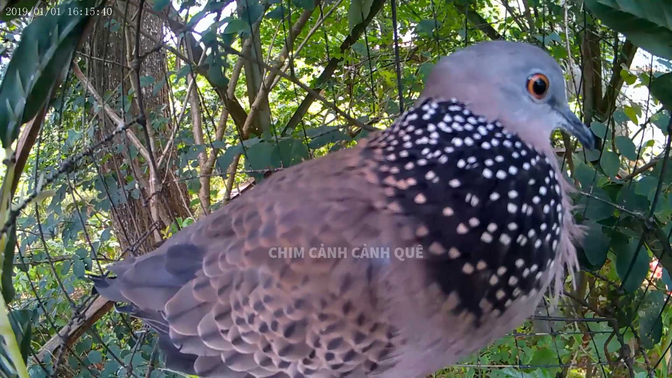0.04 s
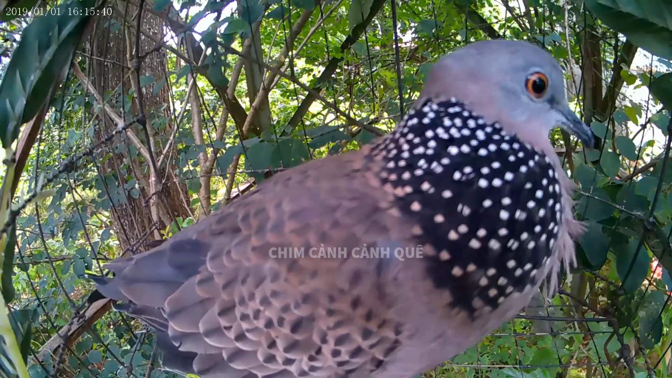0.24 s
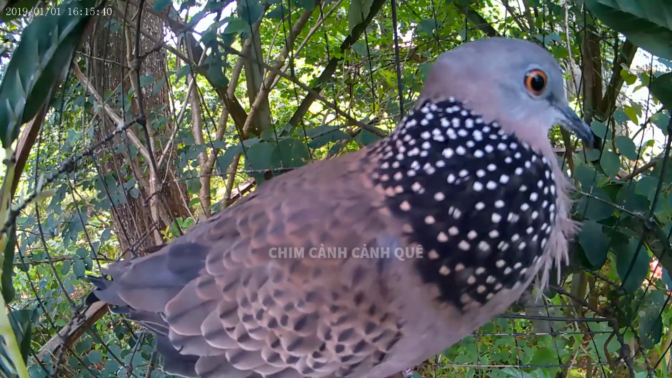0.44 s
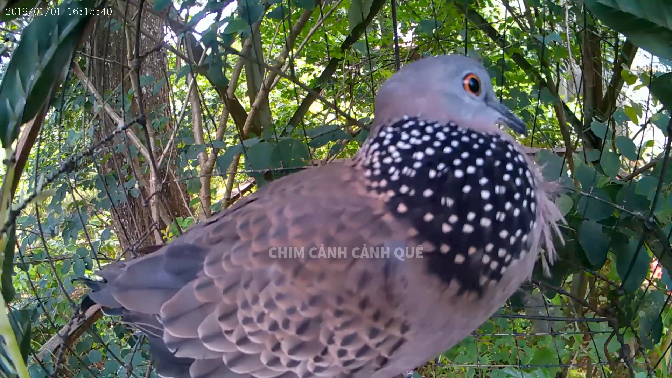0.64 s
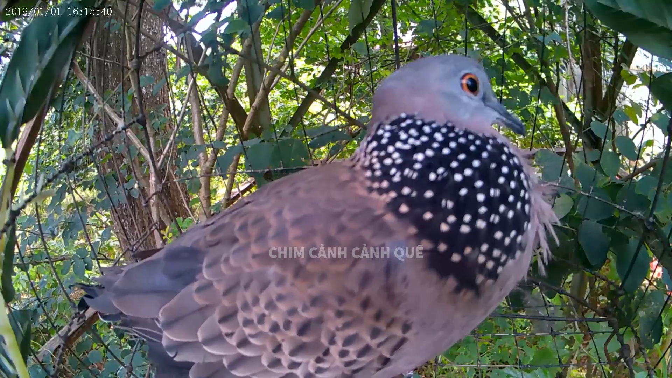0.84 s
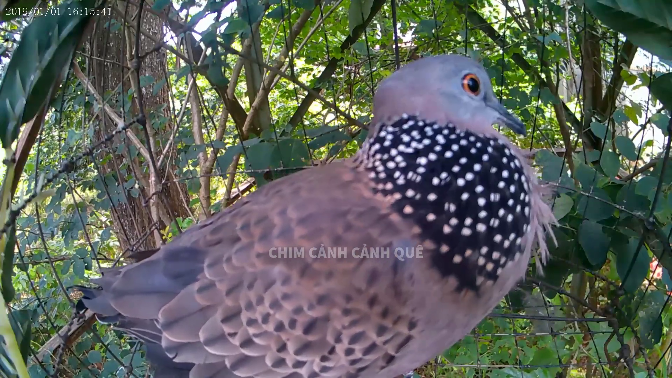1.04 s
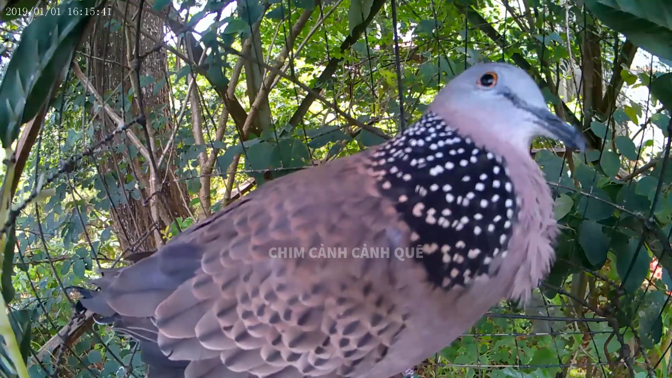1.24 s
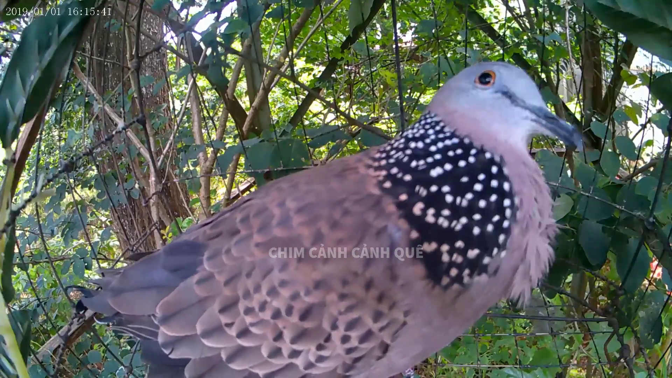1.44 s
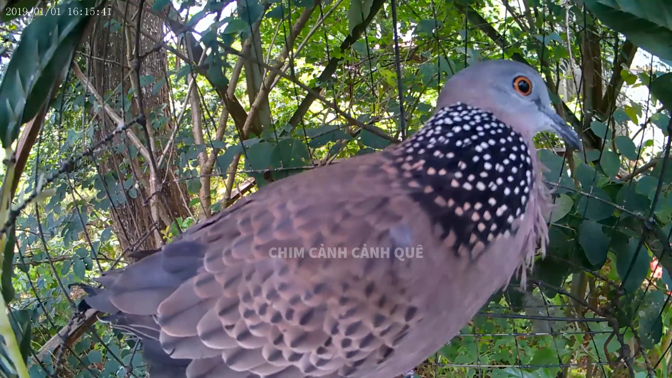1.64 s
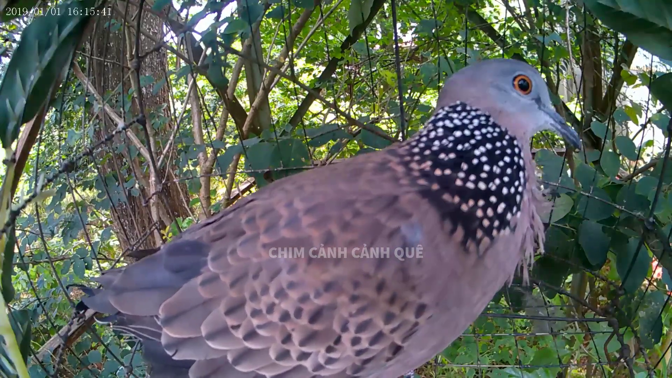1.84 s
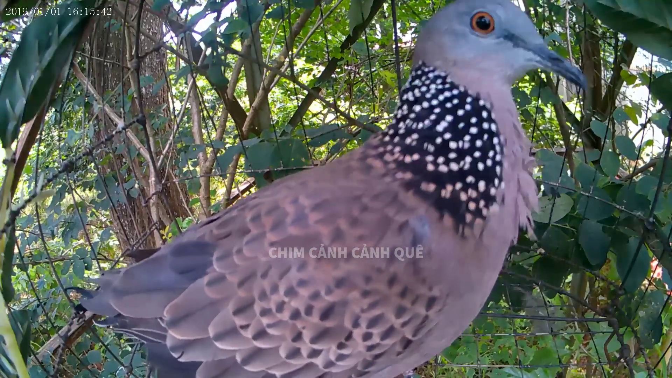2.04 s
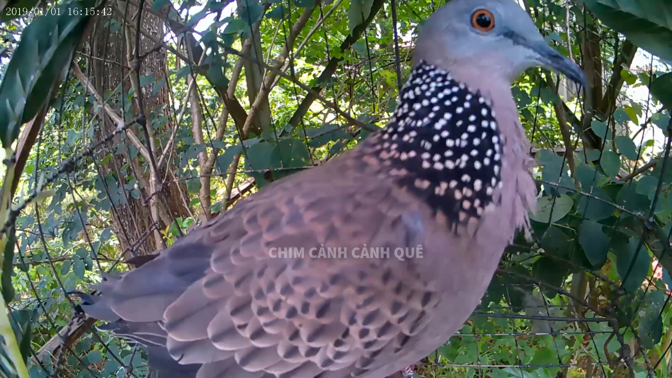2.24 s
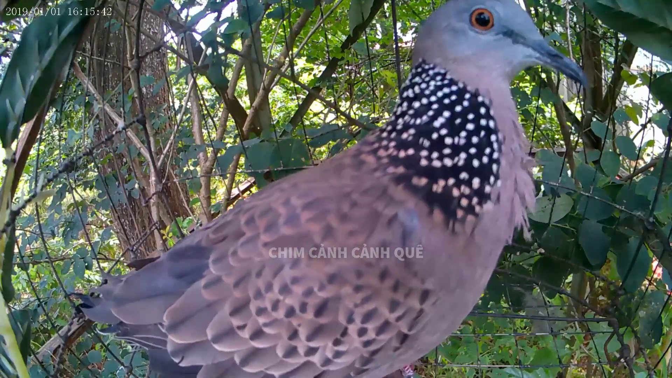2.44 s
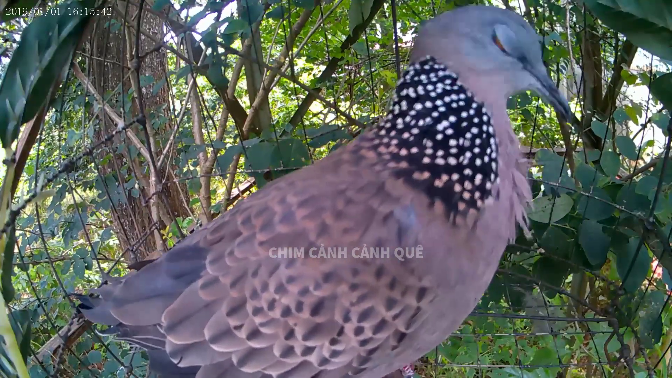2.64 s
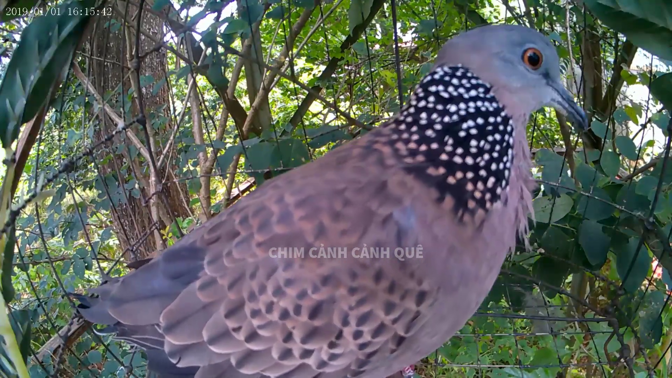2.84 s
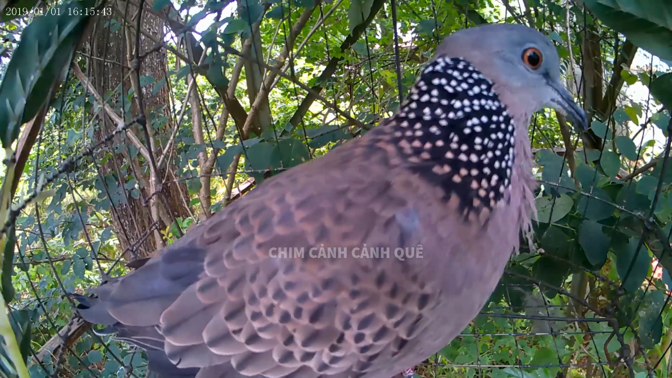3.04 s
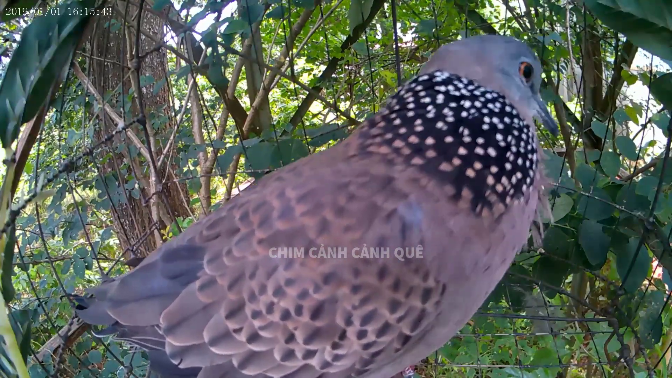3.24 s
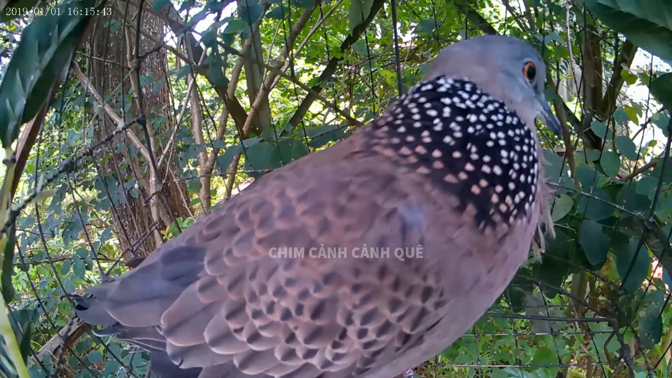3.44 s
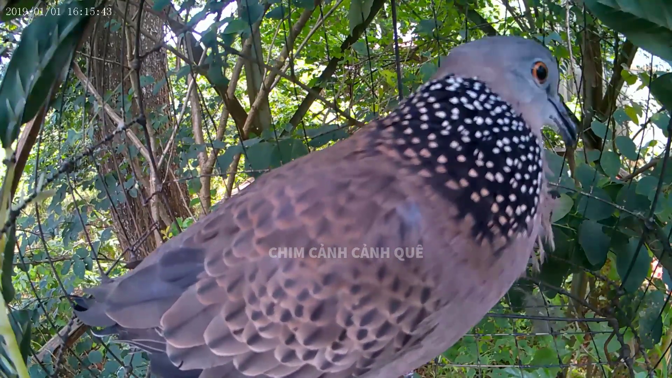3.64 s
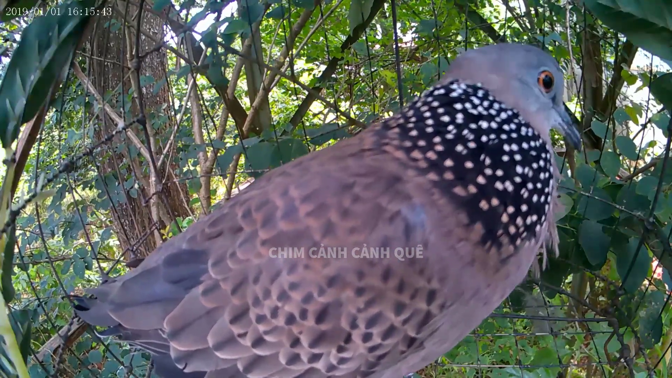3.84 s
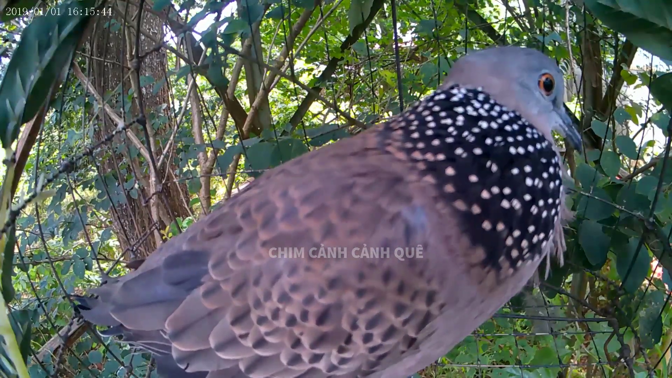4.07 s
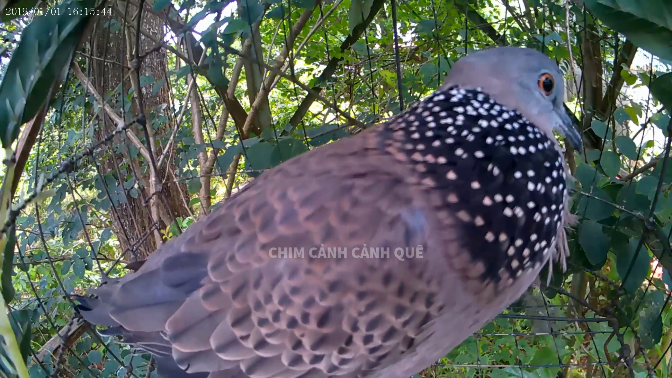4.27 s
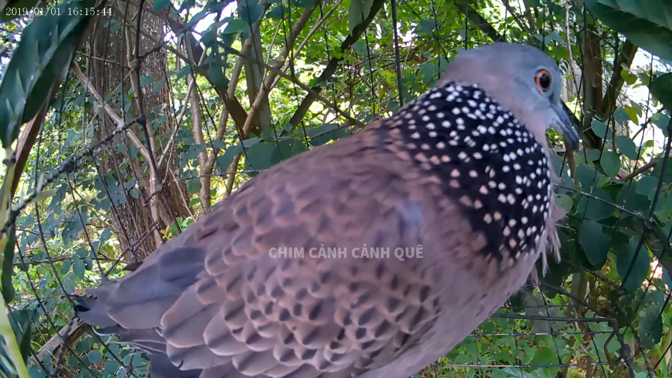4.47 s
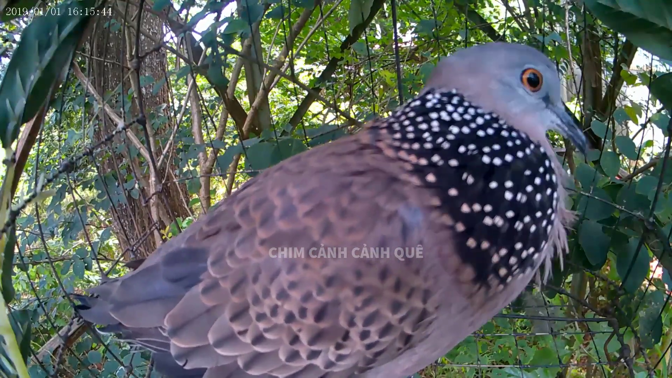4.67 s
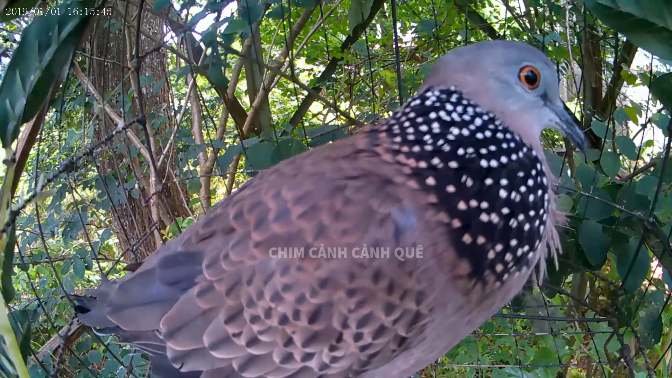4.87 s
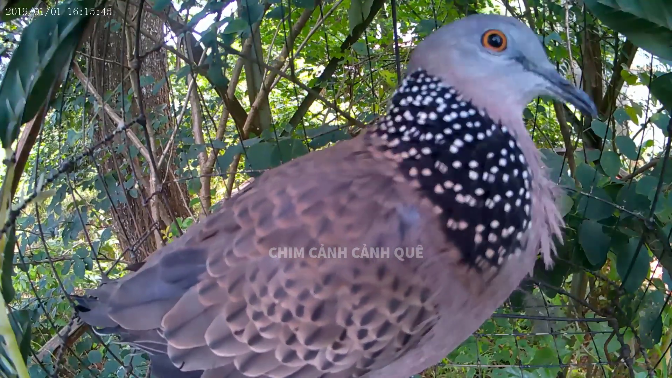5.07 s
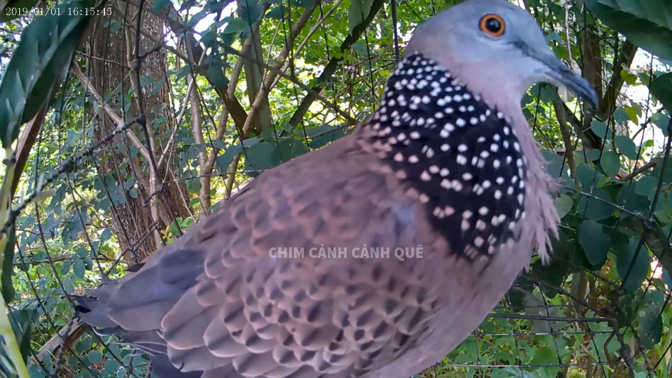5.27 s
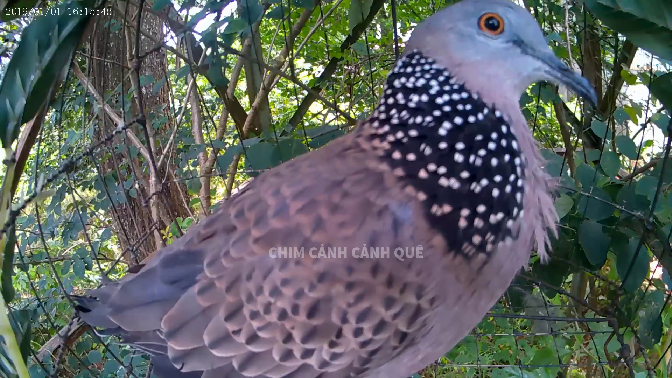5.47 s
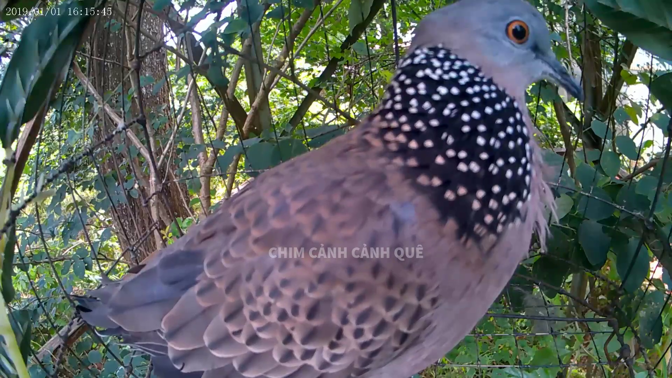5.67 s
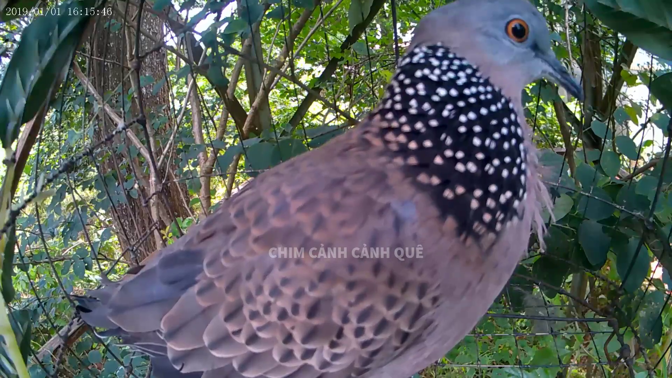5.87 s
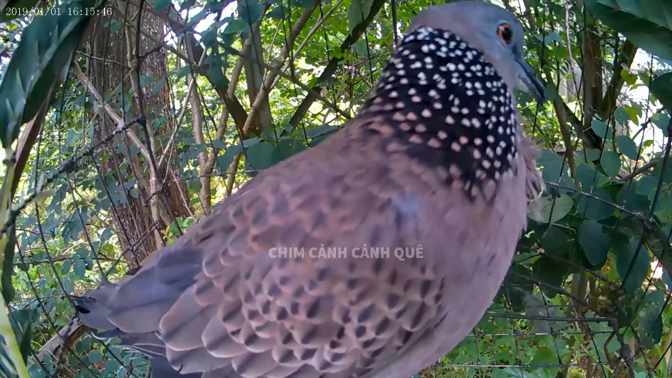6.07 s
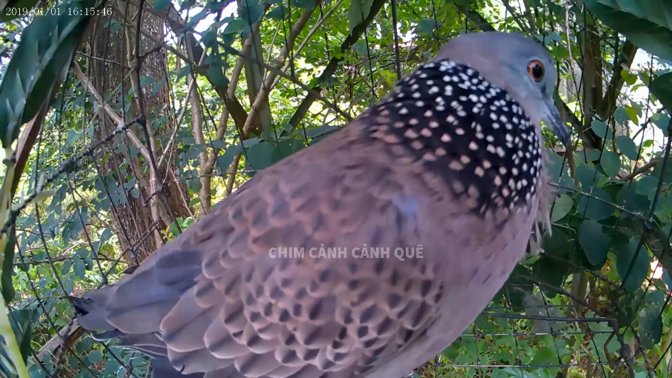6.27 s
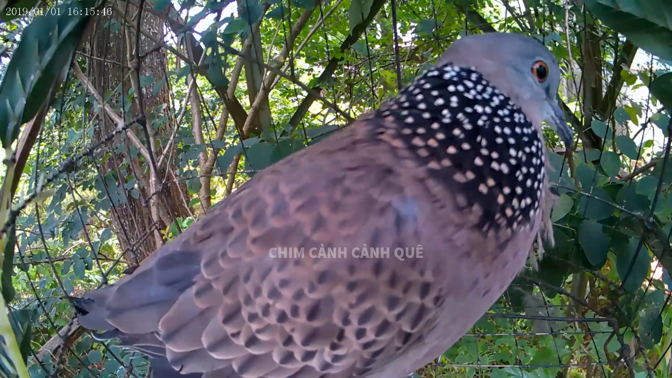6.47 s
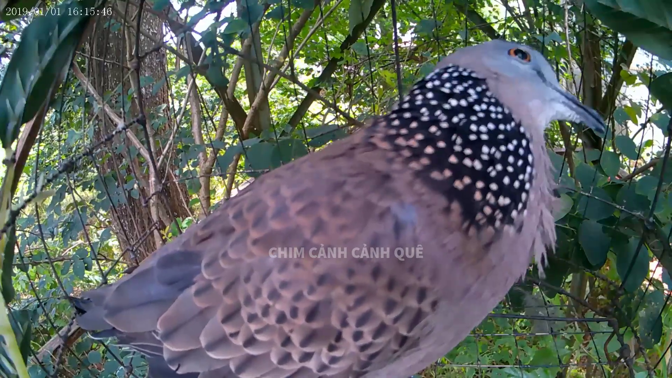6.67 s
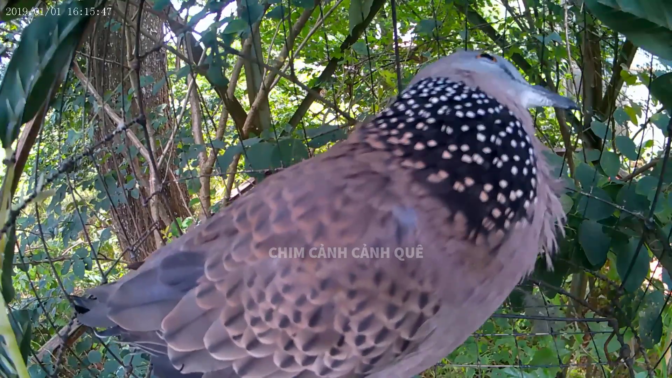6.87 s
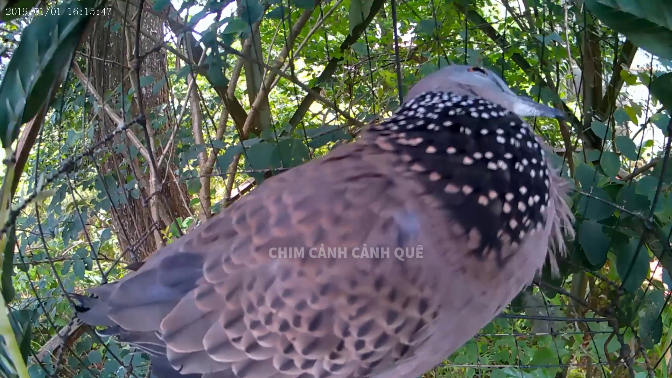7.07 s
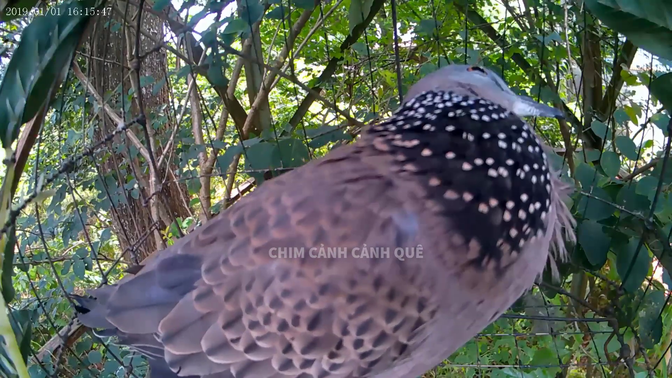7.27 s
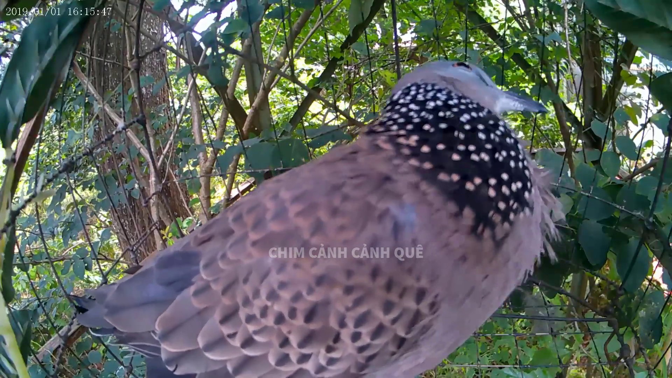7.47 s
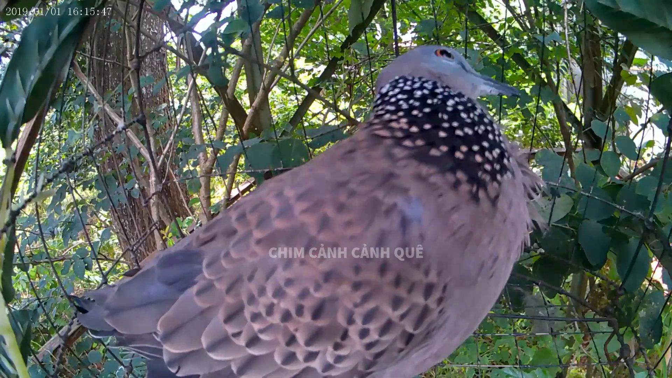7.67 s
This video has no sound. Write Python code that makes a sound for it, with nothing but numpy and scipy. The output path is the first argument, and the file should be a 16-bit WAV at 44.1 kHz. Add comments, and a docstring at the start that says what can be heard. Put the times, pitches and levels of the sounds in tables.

```python
"""A spotted dove coos close by in a leafy enclosure, in phrases of a clipped note, a coo, a long trilled
coo that dips, and a closing coo. Its syrinx is a self-sustained oscillator whose overtones the swollen
throat filters out; the nearly pure tone overloads the microphone input, and clipping turns it buzzy.
Far off an engine hums at multiples of its firing rate and fades, a bird calls faintly,
and light air stirs."""
import sys
import numpy as np
from scipy import signal
from scipy.fft import rfft, irfft, next_fast_len
from scipy.io import wavfile
from scipy.ndimage import uniform_filter1d

SR = 44100
rng = np.random.default_rng(int(sys.argv[2]) if len(sys.argv) > 2 else 0)


def wav_out(sig):
    """Save sig, one row per channel (or a flat mono array), as 16-bit PCM at SR to the path in sys.argv[1]."""
    wavfile.write(sys.argv[1], SR, np.round(np.clip(np.atleast_2d(sig).T, -1, 1) * 32767).astype(np.int16))


N = 340011
TIME = np.arange(N) / SR

# Untrilled coos; a sag_curve of 1 is straight, a higher one holds the top pitch longer:
# start_s, length_s, lead_s, release_s, opening_hz, top_hz, sag_hz, sag_curve, level_db, whistle_db
PLAIN_NOTES = [ (0.274, .178, .017, .079, 660, 761, 255.5, 2.4, -4, -47.5),
               (3.308, 0.03, 0.0011, .012, 620, 718.5, 110, 2, -8.5, -42),
               (3.589, 0.1, .008, .022, 650, 821.9, 169.8, 6, -5.5, -35.5),
               (4.594, 0.19, .019, .082, 668, 779, 280, 2.4, -3.5, -39),
               (6.290, .036, .003, .030, 625, 691.2, 100.2, .6, -8, -39),
               (6.570, 0.11, .007, 0.025, 640, 803, 210, 5.5, -6.5, -47.5)]
# Trilled coos, their pitch lifted after the roll:
# start_s, length_s, roll_s, merge_s, pulse_rate_hz, level_db, lift_hz
TRILLED_NOTES = [(-.487, 0.52, .3, .01, 45, -3.5, 0), (3.844, 0.52, .322, .014, 44.7, -5.5, 4),
                 (6.827, .513, .29, .009, 44.6, -5, 62)]
# Hoarse grunts after the clipped note: start_s, pitch_hz, level_db, decay_db_per_s
GRUNT_NOTES = [(3.339, 783, -25.5, 402), (3.417, 750, -34.5, 480), (6.325, 780.6, -29, 371.5),
               (6.404, 618, -25, 678.5)]
# The engine slowing and fading: time_s, firing_rate_hz, level_db
ENGINE_RUN = [(0, 70, -60.5), (1.1, 68.2, -58.5), (2.1, 66.7, -62.5), (3.25, 65.7, -63.5), (3.7, 65.6, -79),
              (4.4, 65.5, -91.5)]
# Harmonics of the firing rate: order, relative_db
ENGINE_HARMONICS = [(1, -11.5), (2, -2.5), (3, -5), (4, -9), (5, -19), (6, -15.5), (7, -5), (8, -7),
                    (10, -16)]
# Far bird notes: start_s, length_s, first_hz, last_hz, level_db
BIRD_NOTES = [(5.361, 0.41, 2690, 2126, -69), (5.432, .32, 3100, 2340, -72.5),
              (5.57, 0.133, 1040, 1130, -67), (5.76, 0.26, 2180, 2060, -75.5)]
# A far whine and a low hum: start_s, length_s, first_hz, last_hz, level_db, blur_ratio
DRONE_NOTES = [(4.3, 1.7, 533, 521, -77, 0.02), (5.787, 0.323, 141, 138, -60.5, .15)]

# Levels of the background rumble, wash and hiss: time_s, gain_db
WIND_ENVELOPE = [(0, -61), (.75, -67), (2.6, -58.5), (3.3, -59), (3.8, -64), (4.5, -60), (5.7, -59),
                 (6.3, -59), (7.4, -65)]
WASH_ENVELOPE = [(0, 0), (1.5, 0.5), (3.25, 0), (3.75, -8), (5.3, -4), (5.95, 1.5), (6.3, 1), (6.75, -7.5),
                 (7.7, -1.5)]  # ducks around loud coos and slowly returns
LEAF_ENVELOPE = [(0, -89), (1, -87), (2.9, -83), (3.8, -93), (5.3, -94.5), (5.9, -89), (6.7, -95.5),
                 (7.7, -94.5)]

# Spectral densities of the noises: frequency_hz, relative_db
TONE_FUZZ_SPECTRUM = [(100, -17.5), (500, -3.5), (750, 0), (1300, -9.5), (2000, -26.5), (8000, -51.5)]
EXHAUST_SPECTRUM = [(30, -23), (140, -8.5), (360, -20.5), (490, 1), (640, -14), (1000, -28.5), (4000, -61)]
WIND_SPECTRUM = [(10, -23.5), (24, -9), (37, 1), (70, -7), (120, -16.5), (200, -28.5), (400, -42.5),
                 (2000, -78.5)]
WASH_SPECTRUM = [(30, -13), (200, -4), (600, -1), (900, -1.5), (1400, -4), (1750, -13.5), (2500, -17),
                 (5000, -38.5), (15000, -61)]
LEAF_SPECTRUM = [(100, -19.5), (2000, -1.5), (5500, -1.5), (9000, -9.5), (15000, -16)]
RASP_SPECTRUM = [(30, -7.5), (300, -9), (520, -5), (750, -13), (1000, -5.5), (1400, -9), (1750, -17.5),
                 (2300, -16.5), (3300, -30.5), (8000, -36), (15000, -53.5)]

LEAD_RISE_S = .0026  # soft onset of a plain coo and its whistle


def dove(octave_db=-23, muffled_db=-15, fuzz_db=-34, shimmer_db=.5, jitter=.0028, settle_s=.067):
    """Self-oscillation: the syrinx sings a near sine with a weak octave; faint fuzz follows its level."""
    coos = [(start, length, *plain_coo(TIME - start, length, *shape))
            for start, length, *shape, _ in PLAIN_NOTES]
    coos += [(start, length, *trilled_coo(TIME - start, length, *shape))
             for start, length, *shape in TRILLED_NOTES]
    hz, level, catching, rough = np.zeros((4, N))
    for start, length, pitch, gain, roughness in coos:
        gate = during(start - .04, start + length + .01)
        hz += gate * pitch
        level += gate * gain
        rough += gate * roughness
        catching += gate * np.exp(-abs(TIME - start) / settle_s)
    # the harder the coo, the fuller the throat and the purer the tone
    octave = amp(octave_db) / (1 + (level / amp(muffled_db)) ** 2)
    # the voice is hoarse while it catches, and rough while it rolls or frays
    hoarse = 1 + 1.3 * catching
    phase = phase_of(hz * (1 + jitter * (hoarse + 2.6 * rough) * wander(400)))
    tone = amp(shimmer_db * wander(150)) * (np.sin(phase) + octave * np.sin(2 * phase))
    fuzz = amp(fuzz_db) * (hoarse + .4 * rough) * noise(TONE_FUZZ_SPECTRUM)
    return level * (tone + fuzz)


def plain_coo(age, length_s, lead_s, release_s, opening_hz, top_hz, sag_hz, sag_curve, level_db,
              lowest_hz=574.7, break_hz=713, break_s=.023, lead_db=-18, release_db=-45):
    """Register break: the voice climbs, jumps, sags and frays. Gives pitch, gain and roughness."""
    climb = np.maximum(opening_hz + (break_hz - opening_hz) * age / break_s, lowest_hz)
    sag = top_hz - sag_hz * np.clip((age - break_s) / (length_s - break_s), 0, 1) ** sag_curve
    hz = climb + step(age - break_s, width_s=.0018) * (sag - climb)
    lead_in = amp(lead_db) * step(age + lead_s, LEAD_RISE_S)
    onset = np.maximum(amp(level_db) * step(age, width_s=.0014), lead_in)
    ending = np.clip((age - length_s) / release_s + 1, 0, 2)
    roughness = step(age - length_s + release_s, width_s=.01)
    return hz, onset * amp(release_db * ending ** 3), roughness


def trilled_coo(age, length_s, roll_s, merge_s, pulse_rate_hz, level_db, lift_hz,
                top_hz=754.6, swell_db=2.4, dip_s=.17, dip_db=-21.5, end_s=.036, end_db=-30):
    """Modulated oscillation: the coo rolls, smooths out and dips. Gives pitch, gain and roughness."""
    dip_at = length_s - dip_s
    held = np.clip(age / dip_at, 0, 1)
    dip_age = np.maximum(age - dip_at, 0)
    ending = np.clip((age - length_s) / end_s + 1, 0, 2)
    scoop_hz = 85.3 * np.exp(-np.maximum(age, 0) / .016)
    sag_hz = 65.86 * held ** 2
    arch_hz = lift_hz * np.exp(-((age - roll_s - .035) / .024) ** 2)
    dip_hz = 129.74 * (1 - np.exp(-dip_age / .074))
    drop_hz = 131.5 * np.minimum(ending, 1) ** 2
    opening, swing_hz = trill(age, roll_s, merge_s, pulse_rate_hz)
    hz = top_hz - scoop_hz - sag_hz + arch_hz - dip_hz - drop_hz + swing_hz
    effort_db = level_db + swell_db * held + dip_db * (1 - np.exp(-dip_age / .0985))
    gain = amp(effort_db + end_db * ending ** 3) * step(age, width_s=.0024) * opening
    roughness = step(dip_at + .051 - age, width_s=.01)
    return hz, gain, roughness


def trill(age, roll_s, merge_s, pulse_rate_hz, first_pulse_s=.008, speed_up_hz=11,
          half_pulse_s=.0066, unevenness=.075, swing_hz=82, slip_hz=32):
    """Amplitude and frequency modulation: chopped airflow makes rising pulses that quicken and merge."""
    progress = np.clip(age / roll_s, 0, 1)
    rate_hz = pulse_rate_hz + speed_up_hz * progress ** 4
    cycles = np.cumsum(rate_hz * (age >= first_pulse_s)) / SR
    from_middle_s = ((cycles + .5) % 1 - .5) / rate_hz
    half_width_s = half_pulse_s * (1 + unevenness * wander(60))
    pulse = np.exp(-(from_middle_s / half_width_s) ** 4)
    rolling = step(roll_s - age, merge_s)
    closure = rolling * (1 - pulse)
    # the pitch swing opens just after the onset and narrows as the roll ends
    depth_hz = swing_hz * rolling * step(age - .024, width_s=.0055) * (1 - .7 * progress ** 3)
    sweep_hz = depth_hz * (.2 + np.sin(2 * np.pi * cycles + .55))
    return 1 - closure, sweep_hz + slip_hz * closure * wander(110)


def whistle(pitch_hz=2110, ring_s=.007, fade_db_per_s=40, jitter=.008):
    """Exponential decay: a thin whistle sounds with each plain coo and rings on for a moment."""
    level = np.zeros(N)
    for start, length, lead_s, release_s, *_, level_db in PLAIN_NOTES:
        age = TIME - start
        onset = step(age + lead_s, LEAD_RISE_S)
        ring = np.exp(-np.maximum(age - length + release_s / 2, 0) / ring_s)
        level += amp(level_db - fade_db_per_s * np.maximum(age, 0)) * onset * ring
    return level * np.sin(phase_of(pitch_hz * (1 + jitter * wander(300))))


def grunts(rise_s=.0057, flutter_hz=160, jitter=.13):
    """Damped oscillation: weak, fluttering tones die out as the air pressure drops away."""
    tones = np.zeros(N)
    unsteady = 1 + jitter * wander(450)
    flutter = 1 + .5 * np.sin(phase_of(flutter_hz * (1 + .23 * wander(60))))
    for start, pitch_hz, level_db, decay_db_per_s in GRUNT_NOTES:
        age = TIME - start
        onset = np.exp(np.minimum(age, 0) / rise_s)
        level = amp(level_db - decay_db_per_s * np.maximum(age, 0)) * onset
        tones += level * np.sin(phase_of(pitch_hz * unsteady))
    return tones * unit(flutter)


def enclosure_echo(voice, wet_db=-22, first_s=.003, t60_s=.1, echoes_per_s=2000):
    """Scattering: wire, leaves and trunks return a short echo; thin obstacles reflect few low notes."""
    delay = np.arange(SR // 2) / SR
    polarity = rng.choice([-1., 1.], len(delay))
    arrivals = (rng.random(len(delay)) < echoes_per_s / SR) * (delay > first_s)
    response = polarity * arrivals * amp(-60 * delay / t60_s)
    echo = signal.fftconvolve(voice, response)[:N]
    echo = colour(echo, [(500, -14), (650, -7.5), (800, -4), (1500, 3)])
    return amp(wet_db) * np.std(voice) * unit(echo)


def engine(hum_db=.5, exhaust_db=-5, waver_db=4):
    """Harmonic series: periodic firing gives a distant engine wavering orders over its exhaust noise."""
    firing_hz, level_db = follow(ENGINE_RUN)
    phase = phase_of(firing_hz * (1 + .0041 * wander(5.9)))
    hum = sum(amp(db + waver_db * wander(7.9)) * np.sin(round(order) * phase + 2 * np.pi * rng.random())
              for order, db in ENGINE_HARMONICS)
    return amp(level_db) * (amp(hum_db) * unit(hum) + amp(exhaust_db) * noise(EXHAUST_SPECTRUM))


def air(wash_base_db=-70, gust_db=3, swell_db=1.5):
    """Turbulence: wind rumbles on the microphone and hisses in the leaves, over a distant wash."""
    (wind_db,), (wash_db,), (leaf_db,) = map(follow, (WIND_ENVELOPE, WASH_ENVELOPE, LEAF_ENVELOPE))
    wind = amp(wind_db + swell_db * wander(5.6) + gust_db * wander(15)) * noise(WIND_SPECTRUM)
    wash = amp(wash_base_db + wash_db + wander(16)) * noise(WASH_SPECTRUM)
    leaves = amp(leaf_db) * noise(LEAF_SPECTRUM)
    return wind + wash + leaves


def far_tone(start_s, length_s, first_hz, last_hz, level_db, blur, flicker_db=3):
    """Random modulation: a distant glide swells and fades, blurred on its way through the trees."""
    progress = np.clip((TIME - start_s) / length_s, 0, 1)
    hz = first_hz + (last_hz - first_hz) * progress
    level = np.sin(np.pi * progress) * amp(level_db + flicker_db * wander(35))
    return level * unit(np.sin(phase_of(hz * (1 + blur * wander(370)))))


def amp(db):
    """Amplitude ratio of a level in decibels."""
    return 10 ** (np.asarray(db) / 20)


def unit(x):
    """Normalisation to rms 1."""
    return x / np.sqrt(np.mean(x ** 2) + 1e-20)


def follow(rows):
    """Linear interpolation of a time table's columns at every sample."""
    times, *columns = np.transpose(rows)
    return [np.interp(TIME, times, column) for column in columns]


def during(start_s, end_s):
    """Time window with soft edges."""
    return uniform_filter1d(1. * ((TIME >= start_s) & (TIME <= end_s)), size=64)


def step(age, width_s):
    """Logistic step from 0 to 1 around age 0."""
    return .5 + .5 * np.tanh(age / width_s / 2)


def phase_of(hz):
    """Phase as the time integral of frequency."""
    return 2 * np.pi * np.cumsum(hz) / SR


def colour(x, points):
    """Zero-phase filtering through points of frequency_hz, gain_db."""
    hz, db = np.transpose(points)
    size = next_fast_len(N + 4096)
    gain = amp(np.interp(np.log(np.fft.rfftfreq(size, 1 / SR) + 1), np.log(hz), db))
    return irfft(rfft(x, size) * gain, size)[:N]


def noise(spectrum):
    """Spectrally shaped Gaussian noise of rms 1."""
    return unit(colour(rng.standard_normal(N), spectrum))


def wander(per_s):
    """Smooth random fluctuation of rms 1."""
    knots = np.arange(0, N / SR + 1, 1 / per_s)
    curve = np.interp(TIME, knots, rng.standard_normal(len(knots)))
    return unit(uniform_filter1d(curve, int(SR / per_s / 2) + 1))


def scene():
    """Superposition: the near dove and its echo add to the faint background."""
    voice = dove() + whistle() + grunts()
    bird = sum(far_tone(*note, blur=.04) for note in BIRD_NOTES)
    drones = sum(far_tone(*note) for note in DRONE_NOTES)
    return (voice + enclosure_echo(voice) + engine() + air() + bird + drones)[None]


def record(dry, ceiling_db=-10, knee=22, rasp_db=-30, flutter_db=.35, cutoff_hz=15800):
    """Symmetric clipping: the overloaded input adds odd harmonics; filters then soften the treble."""
    drive = dry[0] / amp(ceiling_db)
    clipped = amp(ceiling_db) * drive / (1 + abs(drive) ** knee) ** (1 / knee)
    # the level flutters, and a faint rasp rides on whatever is loud, bright only during overload
    loudness = np.sqrt(abs(uniform_filter1d(clipped ** 2, size=400)))
    overload = uniform_filter1d(1. * (abs(drive) > 1), size=200)
    bright = noise(RASP_SPECTRUM)
    dull = colour(bright, [(1400, 2), (2000, -9.5), (5000, -28.5)])
    rasp = dull + 2 * overload * (bright - dull)
    rough = clipped * amp(flutter_db * wander(320)) + amp(rasp_db) * loudness * rasp
    softened = colour(rough, [(1000, -.5), (2300, -1.5), (3800, -1), (6500, -.5),
                              (10500, -2.5), (12000, -7), (15500, -2.5)])
    lowpass = signal.firwin(511, cutoff_hz, window=("kaiser", 9), fs=SR)
    return signal.oaconvolve(softened, lowpass, "same")[None]


dry = scene()
out = record(dry)
wav_out(out)
```